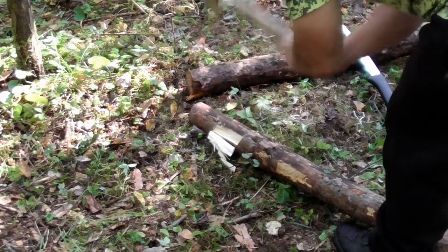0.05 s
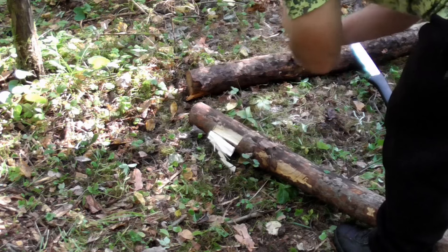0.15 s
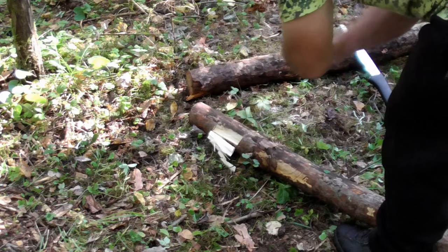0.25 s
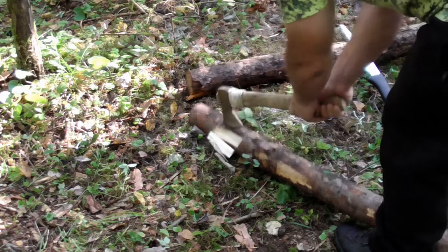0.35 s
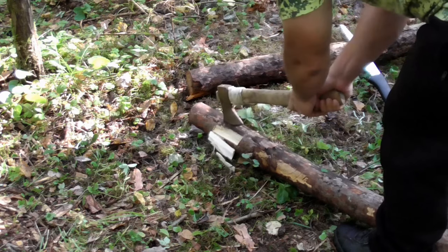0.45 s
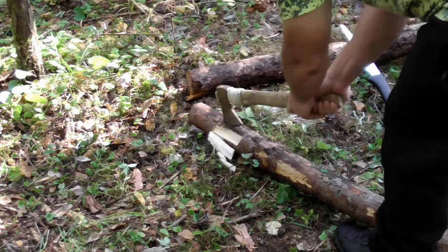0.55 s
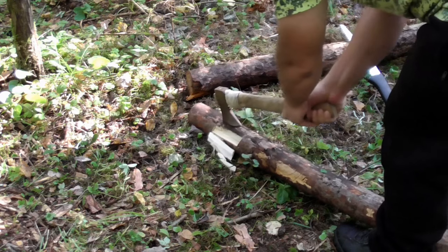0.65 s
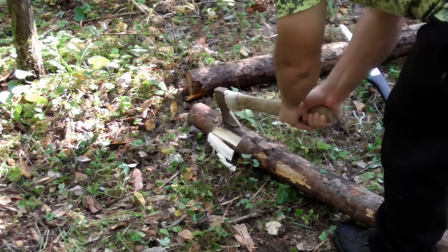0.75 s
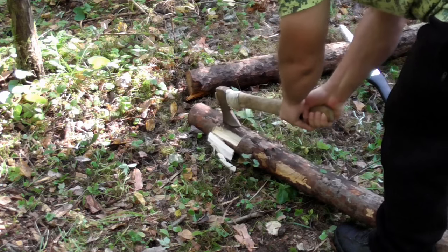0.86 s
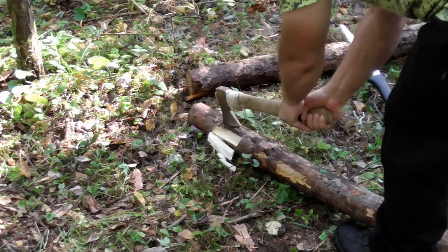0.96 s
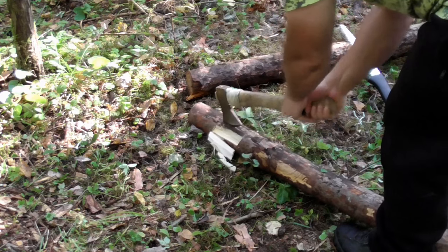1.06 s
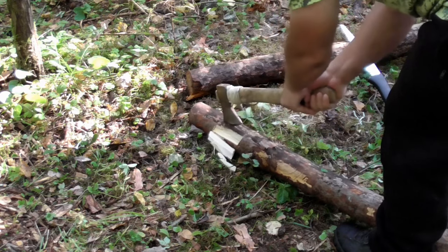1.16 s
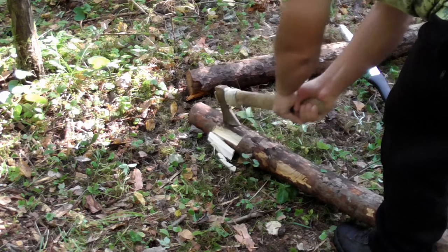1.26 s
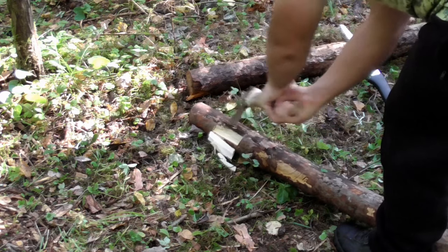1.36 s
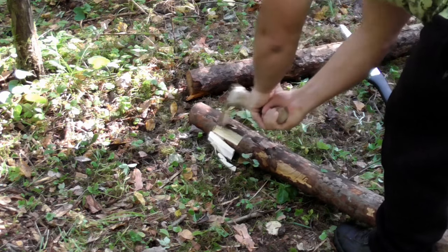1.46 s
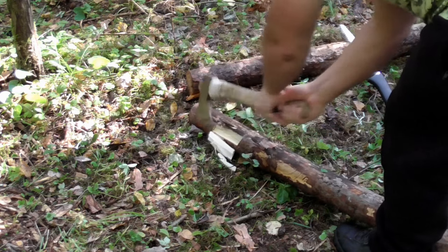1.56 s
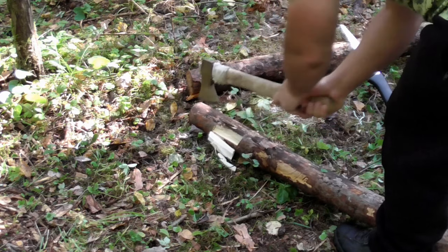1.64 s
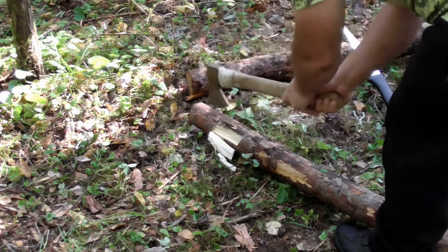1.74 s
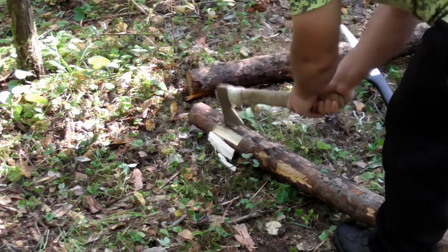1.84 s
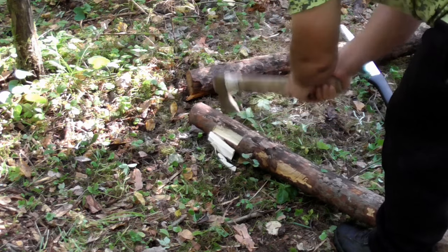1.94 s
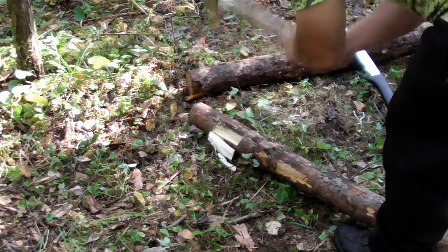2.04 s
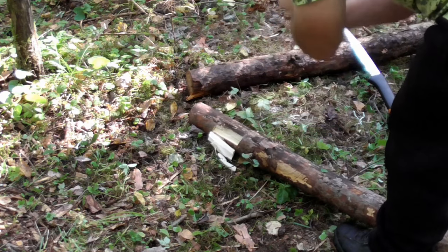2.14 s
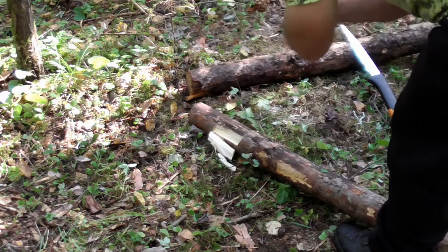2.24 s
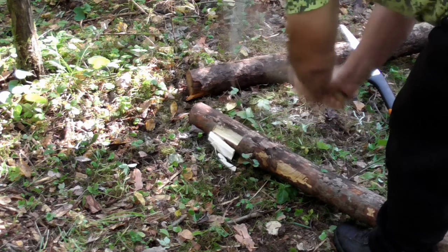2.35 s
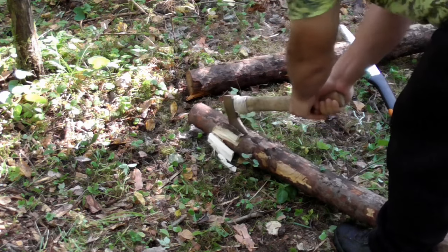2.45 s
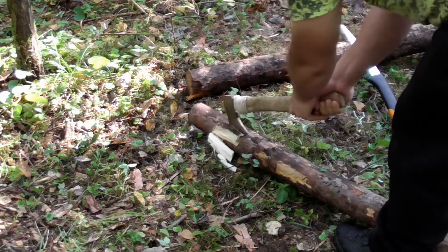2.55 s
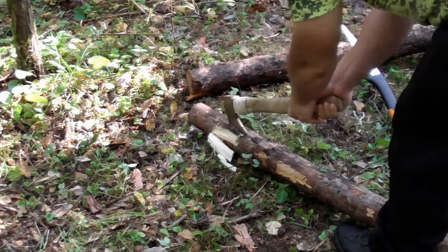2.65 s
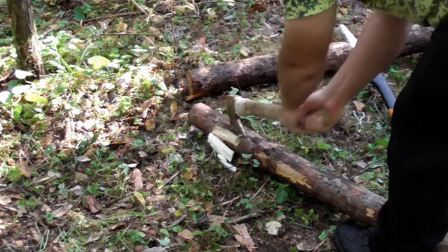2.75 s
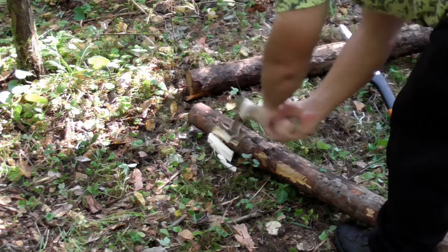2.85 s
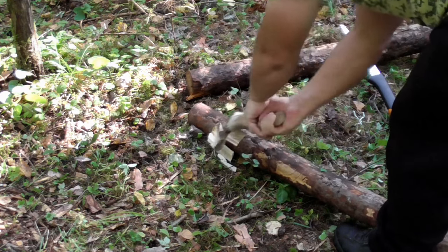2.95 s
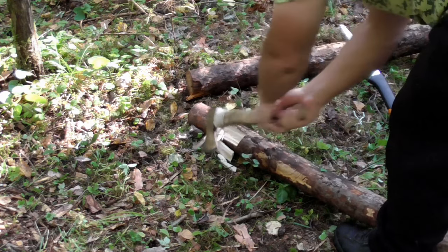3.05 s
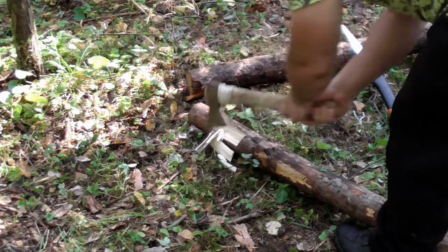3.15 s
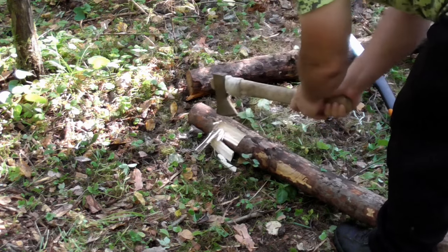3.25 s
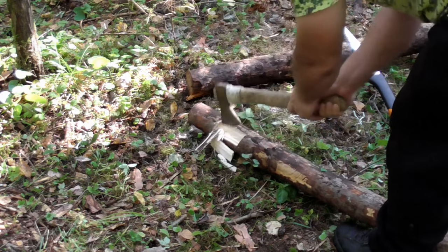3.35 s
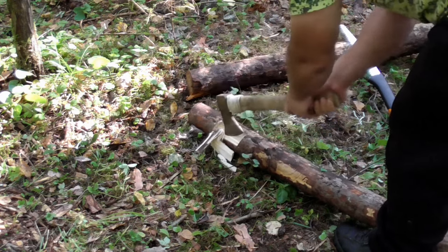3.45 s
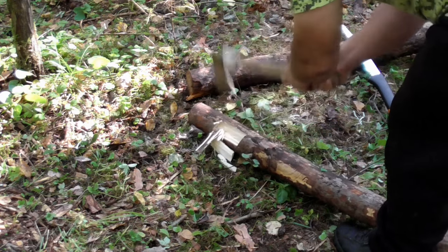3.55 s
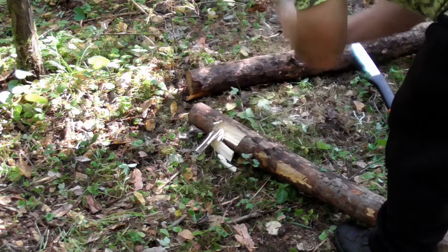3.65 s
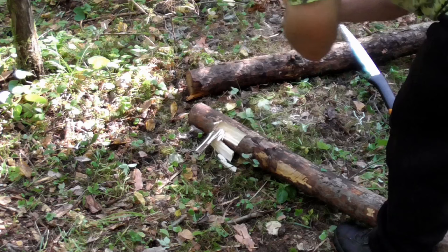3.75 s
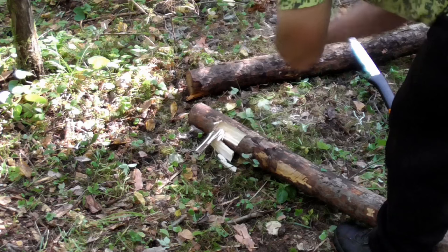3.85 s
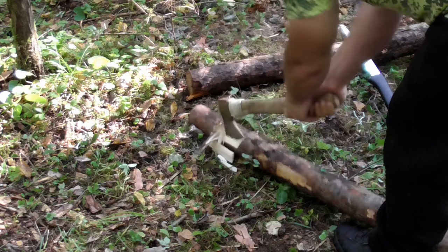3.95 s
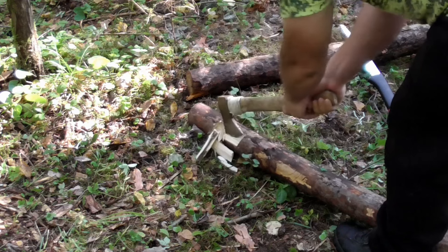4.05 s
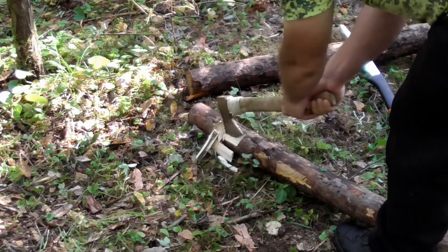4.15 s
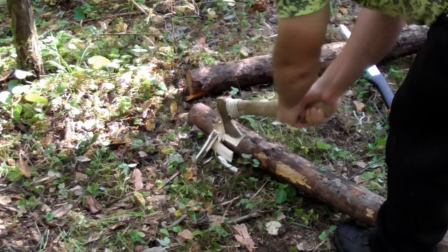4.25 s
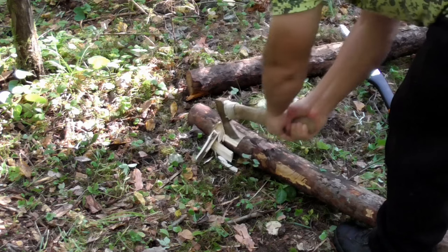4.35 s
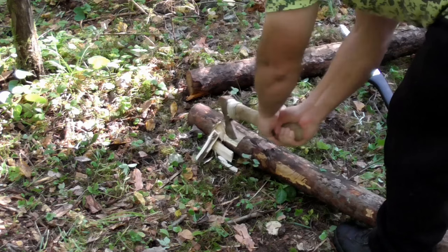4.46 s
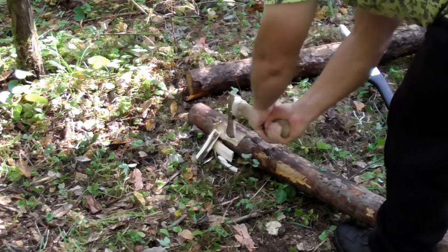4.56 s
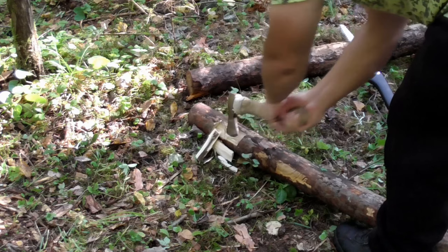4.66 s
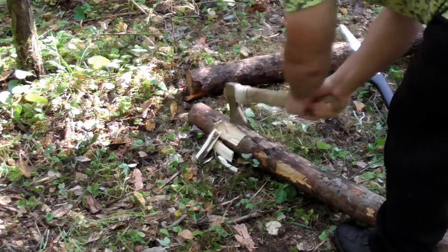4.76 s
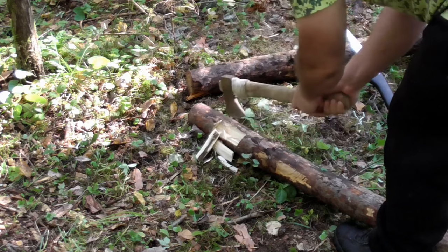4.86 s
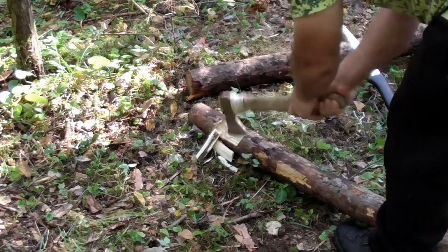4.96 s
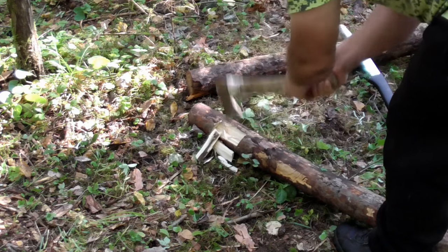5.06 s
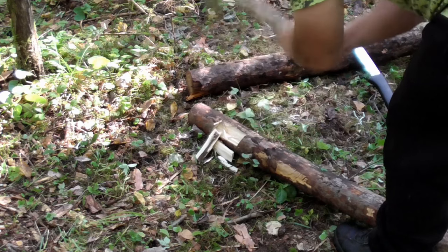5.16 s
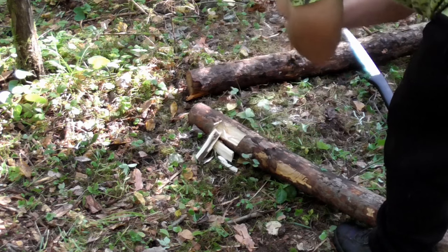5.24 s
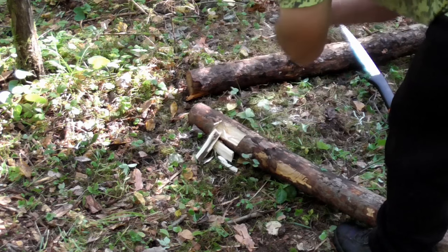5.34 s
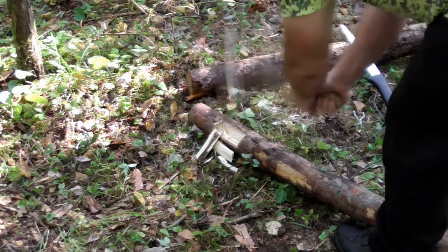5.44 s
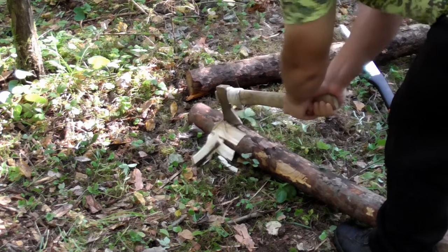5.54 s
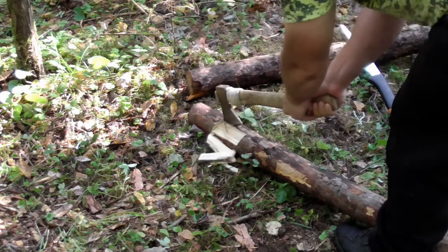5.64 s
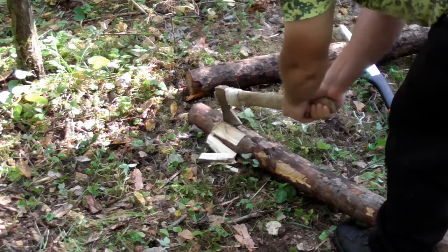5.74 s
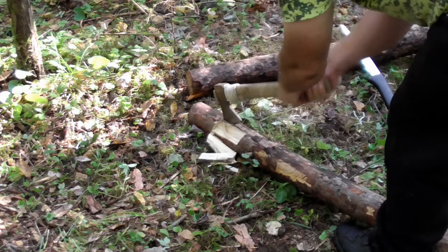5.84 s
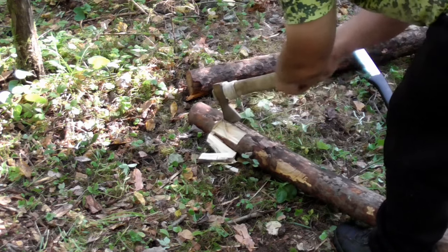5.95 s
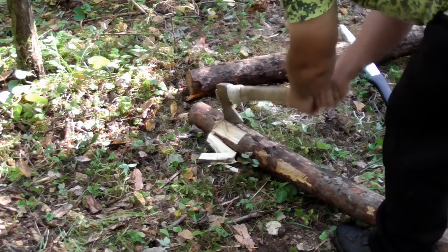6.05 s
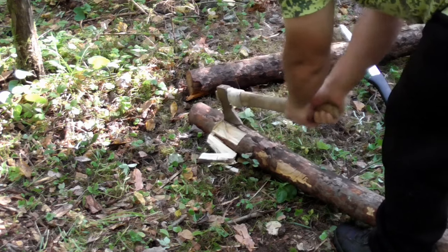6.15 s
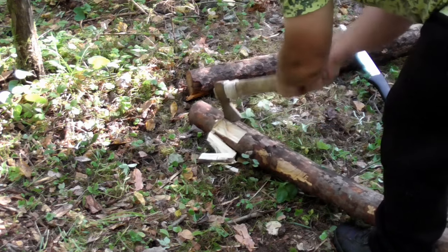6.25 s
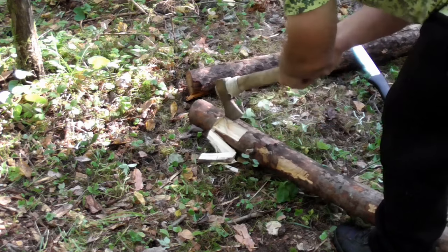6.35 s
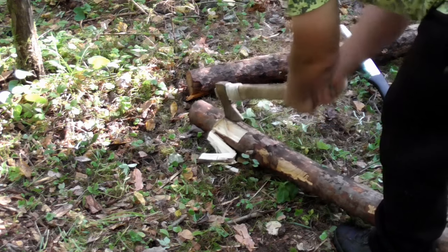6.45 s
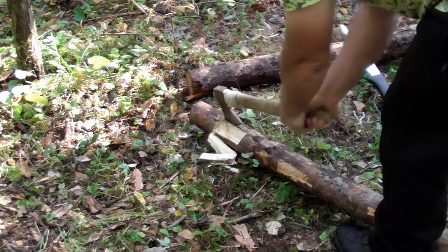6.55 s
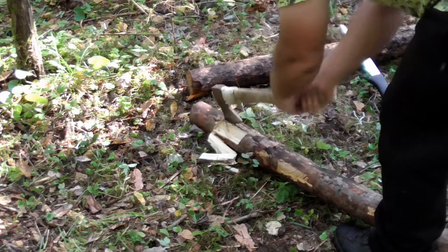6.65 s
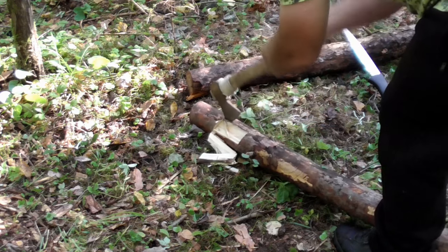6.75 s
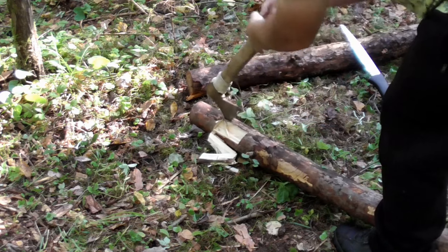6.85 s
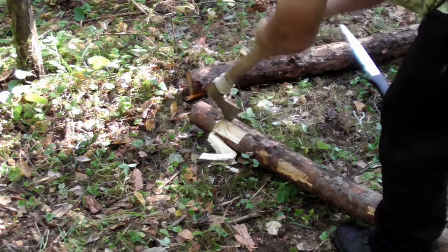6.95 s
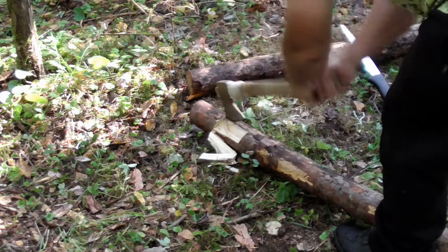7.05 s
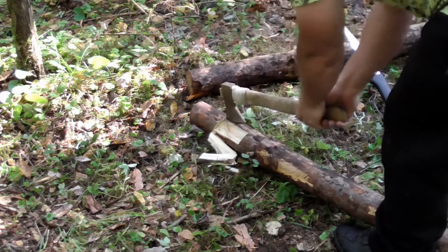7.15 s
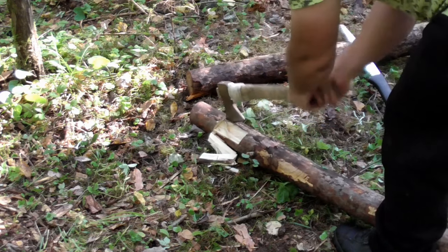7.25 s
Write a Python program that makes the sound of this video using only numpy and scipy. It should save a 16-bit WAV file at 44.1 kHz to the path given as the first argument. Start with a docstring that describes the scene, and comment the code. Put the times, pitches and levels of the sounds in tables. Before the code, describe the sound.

An axe bites into a thin log on a forest floor, then twists, and the wood tears and snaps. Twice more come a light aiming tap, a hard blow and a crackling, splintering twist. The blade rings faintly as it slips free. A last tap and a fourth blow leave two small cracks and a soft rustle of sleeves and leaves. The microphone is close, with a steady distant rush behind.

```python
"""Over a steady distant rush, an axe bites into a thin log on a forest floor. The blade twists in the
cut, and the wood tears and snaps into splinters. Twice more comes a light aiming tap, a hard blow and
a splintering twist; then the steel rings faintly as it slips free. A last tap and a fourth blow leave
two small cracks and a rustle of sleeves and leaves. Throughout, the trees answer faintly and the
nearby camera's gain control ducks after each loud crack."""
import sys
import numpy as np
from scipy import signal
from scipy.fft import rfft, irfft, next_fast_len
from scipy.io import wavfile
from scipy.ndimage import uniform_filter1d, minimum_filter1d, map_coordinates

SR = 44100
rng = np.random.default_rng(int(sys.argv[2]) if len(sys.argv) > 2 else 0)


def int16_out(signal):
    """Quantize to a 16-bit WAV file."""
    q = np.round(np.clip(np.atleast_2d(signal).T, -1, 1) * 32767)
    wavfile.write(sys.argv[1], SR, q.astype(np.int16))


N = 321930
T = np.arange(N) / SR
AGE = np.arange(SR // 2) / SR  # seconds since a hit

# Blows and aiming taps. Each row: start in seconds, force in dB, knock in dB, knock pitch ratio,
# bite in dB, crack in dB, crack and bite hold in seconds, log ring in dB, ground thud in dB.
# The layer levels ride on the force.
AXE_HITS = [(0.4324, -15.5, 2.5, 0.98, 1, -0.5, 0.0026, 0, 6), (1.952, -36, -8, 0.87, 0, 1.5, 0.0029, 1, 8),
            (2.4703, -0.5, -5.5, 0.93, -0.5, -1.5, 0.0032, -19, -11),
            (3.5015, -30.5, -2.5, 1.21, -9, -12.5, 0.0027, -4, -1.5),
            (4.0319, -10, -5.5, 0.877, -0.5, 2, 0.0055, -3.5, -11),
            (5.059, -29.5, 0, 0.874, -7.5, -12.5, 0.004, -10, -4.5),
            (5.5592, -4.5, -9, 1, -2.5, 2, 0.0034, -7.5, 4)]
# The featured splinters. Each row: time in seconds, level in dB, brightness as a tilt in dB per octave
# (fracture() limits it), left over right in dB.
BIG_SNAPS = [(0.9496, -54, 16, -2), (1.003, -45.5, 20, -2), (1.382, -34, 6, -0.5), (1.403, -9.5, 1, 2),
             (1.4318, -30.5, 4.5, -4), (2.8092, -32, -3, -1.5), (2.8415, -32, -1.5, -1),
             (2.8652, -27, 9.5, -1.5), (2.9098, -8.5, -3.5, 0), (2.9326, -18, -5, -2.5),
             (2.9376, -14.5, -0.5, 2), (3.0598, -36, -2.5, 2), (4.415, -34.5, 0, -2),
             (4.445, -27.5, 8.5, -2), (4.462, -32.5, -1.5, 0), (4.4678, -20.5, 2, -0.5),
             (4.5592, -25, 5, -1.5), (4.5706, -16, -1.4, -7), (4.579, -20.5, 7.5, -7.5),
             (4.585, -9.5, 5, -1), (4.621, -17, -1.5, -2.5), (4.7552, -40.5, -0.5, 0),
             (5.765, -42, -2.4, 2), (6.172, -54.5, -2, 2)]
# Heaves on the handle. Each row: moment of giving way in seconds, peak strain in dB, build-up and
# release in seconds per 60 dB, tilt in dB per octave.
HEAVES = [(.8, -57, .3, 0.56, 6.5), (1.0, -52, .45, 0.19, 11), (1.4, -23, 0.077, 0.11, 0.5),
          (2.921, -40, .5, 0.22, 0.5), (3.068, -44.5, 0.29, 0.16, 0), (3.144, -49.5, 0.14, 0.066, -2.5),
          (4.468, -34.5, .2, 0.76, 2.5), (4.584, -26, .2, .06, -0.5), (4.771, -47, 0.084, 0.082, 0.5)]
# The blade slipping free. Each row: start in seconds, level in dB.
BLADE_PULLS = [(4.76, -58), (5.11, -66.5)]
# Sleeves and leaves stirring. Each row: centre in seconds, level in dB, half-width in seconds.
SWISHES = [(0.998, -69, 0.017), (1.186, -67.5, 0.021), (1.9, -74.5, 0.1), (3.724, -73, 0.018),
           (6.376, -66.5, 0.045), (6.615, -72, 0.034), (6.85, -72.5, 0.066), (7.162, -64, 0.032)]

# Resonances. Each row: frequency in Hz before the pitch ratio, relative level in dB, t60 in seconds.
KNOCK_MODES = [(185, 0, 0.02), (408, 6, 0.017), (719, 0, 0.056), (930, -6.5, 0.0089), (1126, -4, .022),
               (1288, -7, 0.033), (2210, -9, 0.011)]  # the wood around the cut
LOG_MODES = [(225, -12.5, 0.033), (291.3, -0.5, 0.13), (434, -4, 0.13), (564, -13.5, .1), (780, -4.5, .08),
             (1090, -25, 0.028), (1435, -26, 0.15)]  # the whole log bending
THUD_MODES = [(72, -12, .17), (97, -10, .14), (145, -2, .11), (178, 1, .1)]  # the log pressed into the soil
STEEL_MODES = [(4400, -7, .22), (8500, 0, .4)]  # the axe head

# Noise colours. Each row: frequency in Hz, relative spectral level in dB.
BITE_COLOUR = [(200, 1), (700, 6), (1300, 5), (1650, -5.5), (2200, 0.5), (3000, -8), (4500, -16),
               (8000, -34.5)]  # the blade wedging in, all midrange
CRACK_COLOUR = [(500, -8.5), (2000, -15), (3500, -7.5), (5000, 0.5), (6000, -7.5), (7600, 5), (9300, -6.5),
                (11500, 3), (14000, -4.5), (16000, -18.5), (18000, -57.5)]  # the bright split of the grain
LITTER_COLOUR = [(60, -17), (130, -6.5), (190, 2), (400, -3.5), (800, -12), (1500, -22.5), (3000, -43.5)]  # dull leaf litter under the log
STEEL_COLOUR = [(2500, -35), (3600, -9), (4300, 0), (5000, -3), (5900, -16), (9000, -35)]  # the thin ring of the gripped blade
SNAP_COLOUR = [(100, -10.5), (500, -7), (1200, -10.5), (2500, -4.5), (3600, -3.5), (5200, 4.5), (7500, 4.5),
               (9400, -6), (11500, 3.5), (14000, -12.5), (16000, -16.5), (18000, -57.5)]  # a splinter parting
FIBRE_COLOUR = [(200, -20), (1000, -6), (2200, -2), (3400, 0), (5000, 0), (7800, 1), (9400, -4),
                (11500, -2), (14000, -6), (16000, -15), (18000, -60)]  # single fibres tearing
RUSTLE_COLOUR = [(500, -6), (2200, 5.5), (3200, 0.5), (4600, 3), (8000, 3.5), (16000, -7.5)]  # sleeves and dry leaves
RUSH_COLOUR = [(15, -65.5), (25, -29.5), (54, -11.5), (119, -15), (275, -7), (372, -4), (408, -2.5),
               (448, -4.5), (552, -5.5), (782, -9), (1770, -32), (2180, -35), (2950, -43.5), (4380, -37.5),
               (6500, -50), (8450, -72), (14300, -120)]  # the distant forest bed
HISS_COLOUR = [(1000, -9.5), (6000, -9.5), (8500, -1.5), (11500, -1.5), (15000, -5), (16000, -8),
               (17000, -41)]  # the camera's own noise

# The tail from the trunks. Each row: frequency in Hz, t60 in seconds.
TRUNK_DECAY = [(100, .12), (600, .16), (1500, 0.18), (4500, 0.22), (9000, 0.33), (15000, .27)]
# How much the trunks send back. Each row: frequency in Hz, echo level in dB.
TRUNK_RETURN = [(100, -37), (700, -12.5), (2000, -17.5), (7000, -16), (15000, -22.5)]
# Stereo image of the rush. Each row: frequency in Hz, left-right correlation (1 is mono).
RUSH_CORRELATION = [(60, .86), (300, .88), (640, .82), (1400, .55), (3100, .35), (6800, 0)]
# Mismatch of the two microphones. Each row: frequency in Hz, left over right in dB.
MIC_BALANCE = [(60, 1), (400, 2.2), (1300, 1.9), (2400, -1), (8000, 1.2), (15000, -6)]


def axe(wood_db=-1, bend_db=-2, soil_db=-13, litter_db=-9, litter_t60=0.11, sing_db=-46, sing_t60=0.81):
    """The blade cracks into the fibres, knocks the wood, bends the log and drives it into the soil."""
    out = np.zeros((2, N))
    for s, force, knock, pitch, bite, crack, hold, log, thud in AXE_HITS:
        add(out, s, amp(force + crack) * fracture(CRACK_COLOUR, hold, t60=.01, width=.25))
        add(out, s, amp(force + bite) * fracture(BITE_COLOUR, hold, t60=.016, width=.2))
        add(out, s, amp(force + knock + wood_db) * ring(KNOCK_MODES, pitch, attack=0.0013))
        add(out, s, amp(force + log + bend_db) * ring(LOG_MODES, pitch=0.94, attack=0.0033))
        add(out, s, amp(force + thud + soil_db) * ring(THUD_MODES, pitch=1, attack=.006))
        # the jolted log shakes the litter under it: a dull, rough thud
        jolt = fade(AGE, litter_t60) * (1 - fade(AGE, t60=.02))
        add(out, s, amp(force + log + litter_db) * jolt * noise(LITTER_COLOUR, len(AGE), width=.35))
        # a thin steely ring lingers, its pitch set by how the cut grips the blade
        gripped = np.array(STEEL_COLOUR) * [1 + .02 * rng.normal(), 1]
        add(out, s, amp(force + sing_db) * noise(gripped, SR, width=0.42) * fade(T[:SR], sing_t60))
    return out


def splinters(shiver_db=-15, recoil_db=-17):
    """Each splinter parts with a click and shivers briefly; the wood recoils with a small knock."""
    out = np.zeros((2, N))
    for s, db, tilt, pan in BIG_SNAPS + small_snaps():
        snap = fracture(SNAP_COLOUR, hold=.0006, t60=.002, width=.3, tilt_db=tilt)
        shiver = fracture(SNAP_COLOUR, hold=0.0018, t60=0.028, width=0.29, tilt_db=tilt)
        recoil = fracture(BITE_COLOUR, hold=.001, t60=.015, width=.2)
        sound = snap + amp(shiver_db) * shiver + amp(recoil_db - np.maximum(tilt, 0)) * recoil
        balance = amp([[pan / 2], [-pan / 2]])
        add(out, s - .0004, amp(db) * balance * sound)
    return out


def small_snaps(count=5, range_db=16.5, above_db=2.5, extra_tilt_db=1):
    """Cues for lesser splinters, scattered within range_db of peak strain: more strain, louder snap."""
    rows = []
    for s, db, build, release, tilt in HEAVES:
        place = (np.arange(count) + rng.random(count)) / count
        times = s + (place * (build + release) - build) * range_db / 60
        levels = strain(times, s, db, build, release) + above_db
        for t, level in zip(times, levels):
            rows.append((t, level, tilt + extra_tilt_db + 2 * rng.normal(), rng.normal()))
    return rows


def tearing(fibres_per_s=1800, trim_db=-6.5):
    """A fine, dense crackle of single fibres under the snaps; it follows the strain of each heave."""
    out = np.zeros((2, N))
    for s, db, build, release, tilt in HEAVES:
        t = s - .5 + T[:SR]
        sizes = amp(3.5 * np.minimum(rng.exponential(size=SR), 3))
        breaks = rng.random(SR) < fibres_per_s / SR
        grains = signal.fftconvolve(sizes * breaks, fade(AGE[:SR // 100], t60=.004))[:SR]
        crackle = unit(grains * noise(FIBRE_COLOUR, SR, width=.4, tilt_db=tilt))
        add(out, t[0], amp(trim_db + strain(t, s, db, build, release)) * crackle)
    return out


def strain(t, peak_s, db, build, release):
    """One heave's envelope in dB: the strain climbs until the fibres give, then slackens."""
    return db - 60 * np.maximum((peak_s - t) / build, (t - peak_s) / release)


def blade_ring(flutter_db=4):
    """Scraping free of the cut, the axe head rings faintly and unevenly."""
    out = np.zeros((2, N))
    for s, db in BLADE_PULLS:
        add(out, s, amp(db) * ring(STEEL_MODES, pitch=0.97, attack=0.011))
    return out * unit(amp(flutter_db * wobble(140)))


def rustles(flutter_db=2.4):
    """Sleeves and leaf litter give soft, uneven swishes as the body shifts."""
    swell = sum(amp(db) * np.exp(-.5 * ((T - s) / spread) ** 2) for s, db, spread in SWISHES)
    return swell * unit(amp(flutter_db * wobble(120)) * noise(RUSTLE_COLOUR, N, width=0.5))


def forest_echoes(x, ground_db=-19, ground_t60=.05, predelay_s=.004):
    """The ground and many trunks scatter the sound: each band comes back as a diffuse, dying tail."""
    # thin trunks scatter little bass
    scattered = filtered(x.mean(0), lambda hz: hz ** 2 / (hz ** 2 + 700 ** 2))
    hz, t, direct = signal.stft(scattered, SR, nperseg=128)
    # sound leaves the log in all directions, so its sharp colours average out
    power = uniform_filter1d(np.abs(direct) ** 2, size=9, axis=0)
    delay = t[t < .6]

    def tail(t60):
        """Share of the energy that returns at each delay."""
        share = fade(delay, t60) ** 2 * (delay > predelay_s)
        return share / share.sum(-1, keepdims=True)

    ground = amp(ground_db) ** 2 * tail(ground_t60)
    trunks = amp(along(TRUNK_RETURN, hz))[:, None] ** 2 * tail(along(TRUNK_DECAY, hz)[:, None])
    energy = np.abs(signal.fftconvolve(power, ground + trunks, axes=1))[:, :len(t)]
    diffuse = signal.stft(rng.standard_normal((2, N)), nperseg=128)[2]
    return signal.istft(diffuse / diffuse.std() * np.sqrt(energy), nperseg=128)[1][:, :N]


def distant_rush(rush_db=-50.5):
    """The bed: a steady far-off rush, near mono in the bass and wide on top."""
    def mid_side_gains(hz):
        angle = np.arccos(along(RUSH_CORRELATION, hz)) / 2
        return amp(along(RUSH_COLOUR, hz)) * [np.cos(angle), np.sin(angle)]

    mid, side = filtered(rng.standard_normal((2, N)), mid_side_gains)
    drift_db = .25 * wobble(1.5) + .5 * wobble(9)
    return amp(rush_db + drift_db) * unit(np.array([mid + side, mid - side]))


def fracture(colour, hold, t60, width, tilt_db=0):
    """A burst that holds while the wood breaks, then dies; as much energy as 2 ms at rms 1."""
    t = AGE[:SR // 20]
    envelope = fade(t - hold, t60) * (1 - fade(t, t60=0.0033))
    burst = envelope * noise(colour, len(t), width, np.clip(tilt_db, -6, 8))
    return unit(low_cut(burst, hz=250)) * np.sqrt(.002 / .05)


def ring(modes, pitch, attack):
    """A struck body: damped modes, a little different in strength each hit, alternating in polarity."""
    sines = [(-1) ** k * amp(db + rng.normal()) * fade(AGE, t60) * np.sin(2 * np.pi * hz * pitch * AGE)
             for k, (hz, db, t60) in enumerate(modes)]
    return np.sum(sines, 0) * (1 - np.exp(-AGE / attack))


def noise(colour, size, width, tilt_db=0):
    """Coloured stereo noise at rms 1; width is side over mid, tilt_db is per octave above 1 kHz."""
    def eq(hz):
        return amp(along(colour, hz) + tilt_db * np.log2(np.maximum(hz, 1000) / 1000))

    mid, side = rng.standard_normal((2, size))
    return unit(filtered(np.array([mid + width * side, mid - width * side]), eq))


def filtered(x, response):
    """EQ x with a gain curve given as a function of Hz."""
    n = x.shape[-1]
    padded = next_fast_len(n + SR // 10)
    return irfft(rfft(x, padded) * response(np.fft.rfftfreq(padded, 1 / SR)), padded)[..., :n]


def low_cut(x, hz):
    """Roll off the bass at 12 dB per octave."""
    return signal.sosfilt(signal.butter(2, hz, "high", fs=SR, output="sos"), x)


def amp(db):
    """Decibels to gain."""
    return 10 ** (np.asarray(db) / 20)


def unit(x):
    """Scale to rms 1."""
    return x / np.sqrt(np.mean(x ** 2) + 1e-20)


def along(points, hz):
    """Read a curve of (Hz, value) points on a log frequency axis."""
    freqs, values = np.transpose(points)
    return np.interp(np.log(hz + 1), np.log(freqs), values)


def fade(t, t60):
    """Hold until t = 0, then fall 60 dB every t60 seconds."""
    return np.exp(-np.log(1000) * np.maximum(t, 0) / t60)


def wobble(rate):
    """Smooth random modulation, rate knots a second."""
    return map_coordinates(rng.standard_normal(int(N * rate / SR) + 4), [T * rate])


def add(track, s, sound):
    """Mix a sound into the track at s seconds."""
    part = track[:, round(s * SR):][:, :sound.shape[-1]]
    part += sound[..., :part.shape[-1]]


def scene():
    """The work on the log up front, its echoes behind, the forest bed underneath."""
    work = axe() + splinters() + tearing() + blade_ring() + rustles()
    return work + forest_echoes(work) + distant_rush()


def gain_control(x, knee_db=-18.5, recovery_db_per_s=34):
    """Sharp treble peaks duck the gain at once; it climbs back steadily."""
    treble = filtered(x.mean(0), lambda hz: hz > 3000)
    level_db = 10 * np.log10(np.abs(uniform_filter1d(treble ** 2, size=SR // 500)) + 1e-12)
    over_db = np.maximum(level_db - knee_db, 0)
    climb_db = recovery_db_per_s * T
    duck_db = np.maximum.accumulate(.7 * over_db + climb_db) - climb_db
    gain_db = minimum_filter1d(-duck_db, size=177)  # opens the duck 2 ms ahead of the peak
    return x * amp(uniform_filter1d(gain_db, size=89))


def record(dry, hiss_db=-70, top_hz=16100):
    """The camera: two slightly unequal microphones, a low cut, gain control, hiss and a band limit."""
    mics = filtered(dry, lambda hz: amp(np.outer([.5, -.5], along(MIC_BALANCE, hz))))
    ducked = gain_control(low_cut(mics, hz=55))
    hiss = amp(hiss_db) * noise(HISS_COLOUR, N, width=0.99)
    return filtered(ducked + hiss, lambda hz: 1 / np.sqrt(1 + (hz / top_hz) ** 160))


dry = scene()
out = record(dry)
int16_out(out)
```